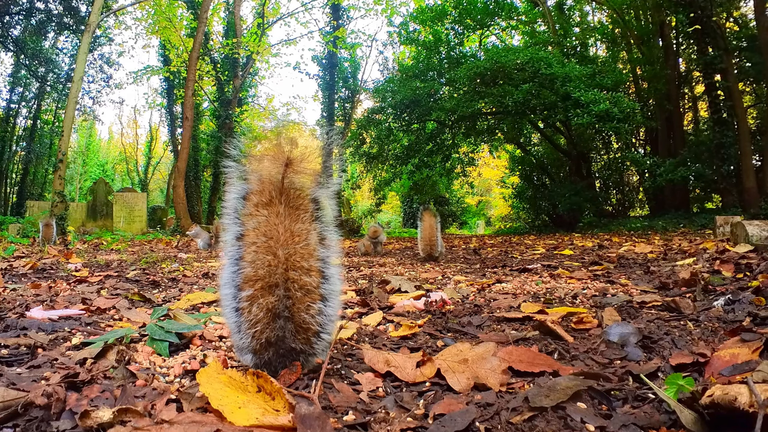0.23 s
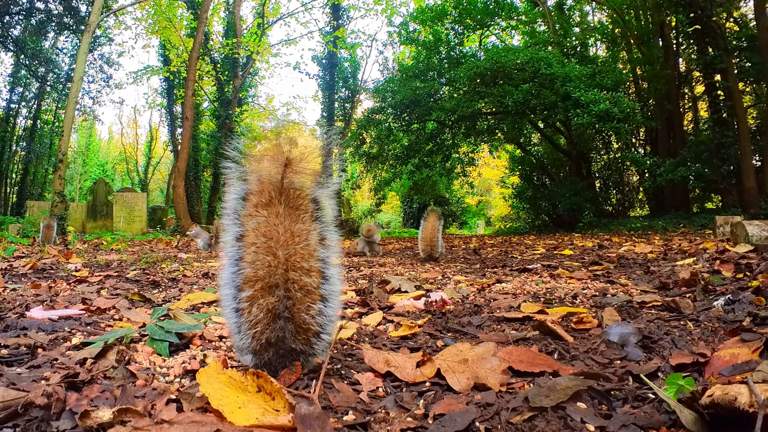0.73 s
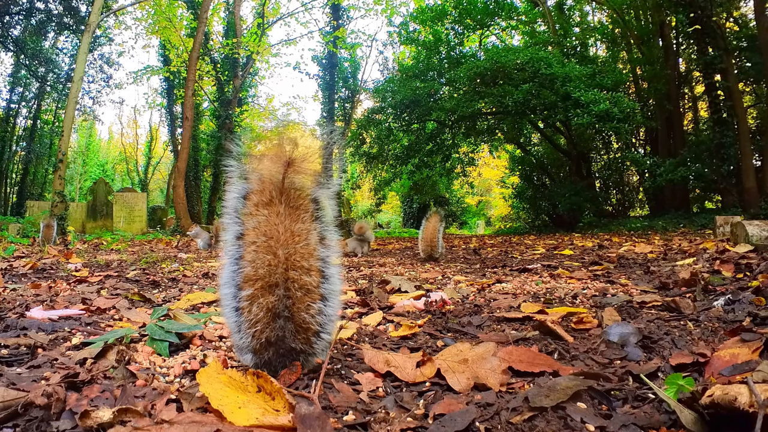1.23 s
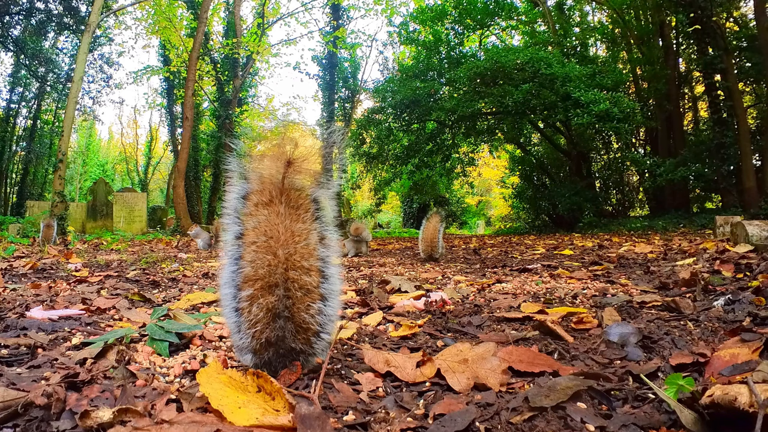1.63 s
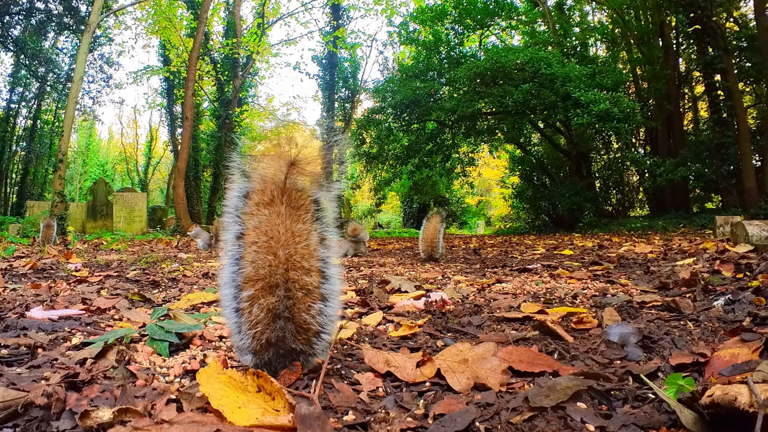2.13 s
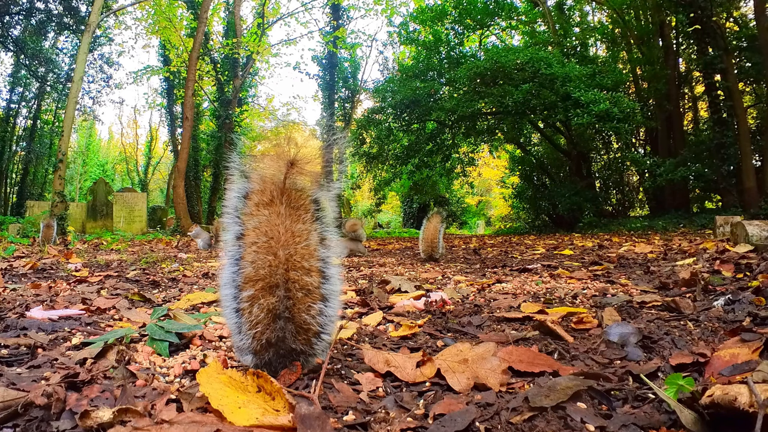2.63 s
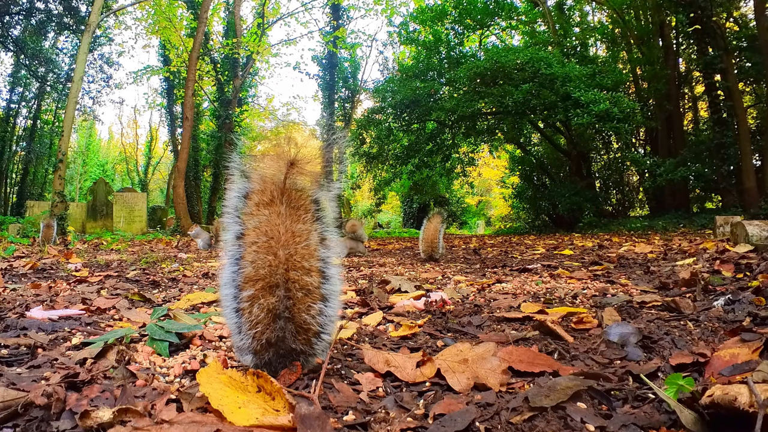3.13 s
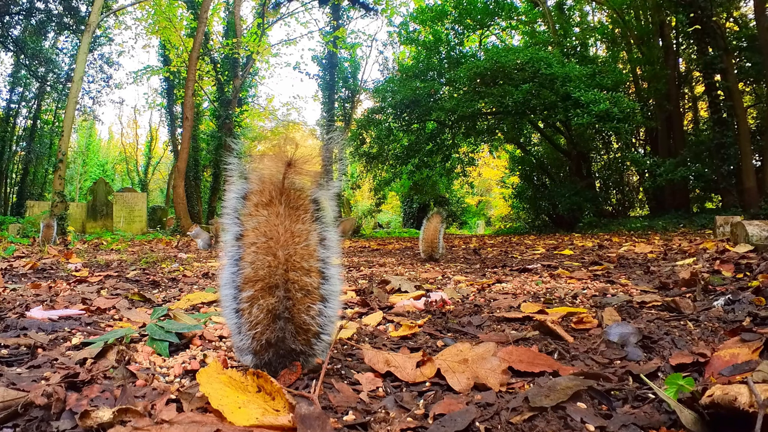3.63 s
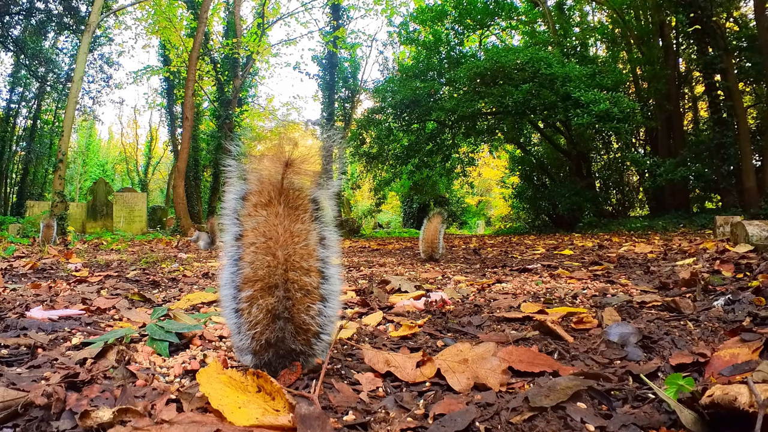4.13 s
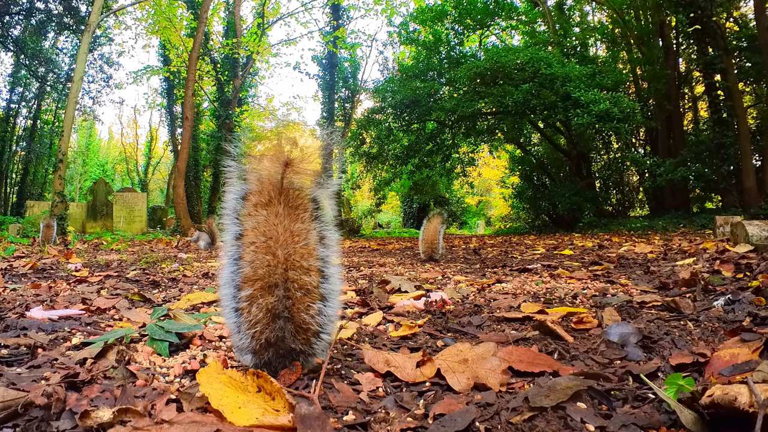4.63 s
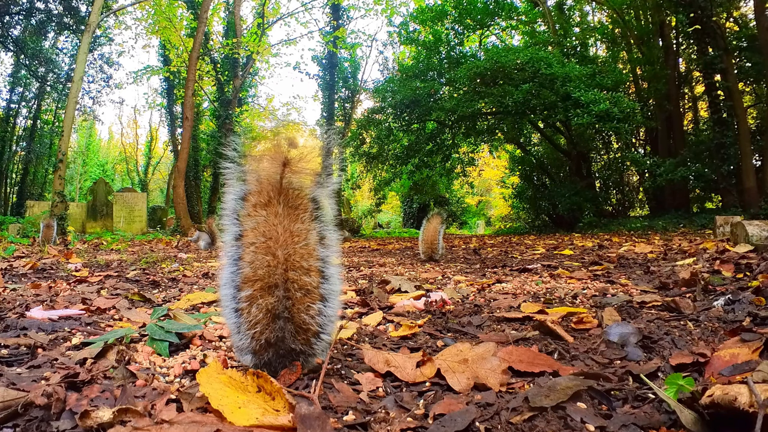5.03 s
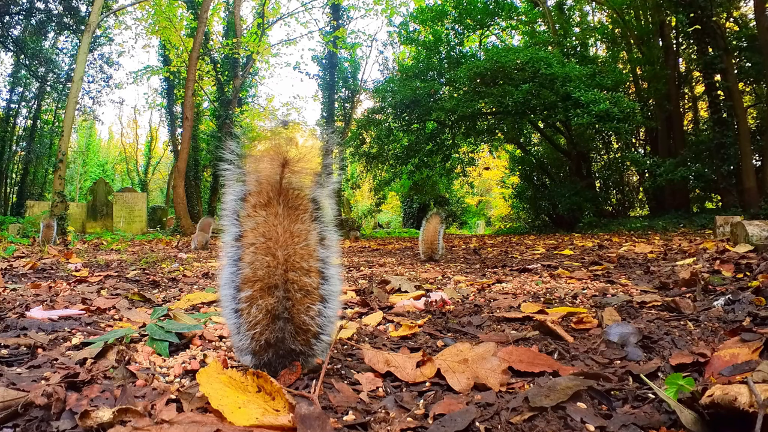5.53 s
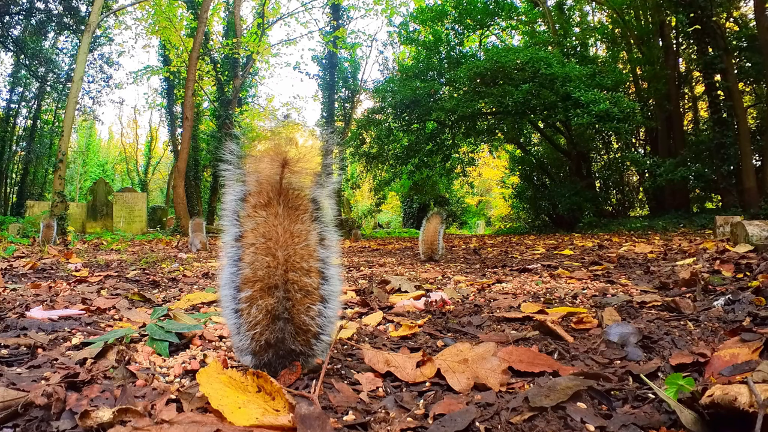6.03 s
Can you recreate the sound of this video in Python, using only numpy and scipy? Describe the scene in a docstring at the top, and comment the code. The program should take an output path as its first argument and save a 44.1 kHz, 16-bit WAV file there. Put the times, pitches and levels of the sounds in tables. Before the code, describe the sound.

A wooded place with a quiet, wavering distant rumble and faint smooth hiss throughout. From 0 to 1.3 seconds a gull-like bird gives five arched yelps, about 0.3 seconds apart; a tiny sliding cry overlaps the first and a rasping bark comes at 0.45. A loud hoarse squawk at 1.4 starts rough, breaks upward and sinks; a deep dull thump lands at 1.6. Shrill parakeet-like screeches come at 1.8, 2.1 and 2.35, with a weaker squawk at 2.1 and a stronger one at 2.6. A short cry and faint squawk fall near 2.9 to 3. Close dry leaves rustle from 3 to 3.9, with small thuds and scuffs from 3.4 to 4 and a squawk at 3.65. Three louder screeches at 4.35, 4.6 and 4.9 run into a piercing cry, thin scream and faint squawk around 5. A noisy bark at 5.7 and last squawk at 5.8 fade in woodland echo; faint rustling ends it.

```python
"""Over a low distant rumble and hiss, a gull-like bird yelps five times, past a sliding cry and a rasping bark.
Its hoarse squawks then run on nearly to the end; a thump lands during the first, and a parakeet-like bird
screeches three times around the second. Leaf litter rustles and crackles under a small animal; three more
screeches, cries, a thin scream and a last bark follow. The calls are summed harmonics that roughness splits
and blurs, echoed by trunks; footfalls are damped thuds with crackle, and leaves are tiny decaying grains."""
import sys
import numpy as np
from scipy import signal
from scipy.fft import rfft, irfft
from scipy.io import wavfile
from scipy.ndimage import map_coordinates

SR = 44100
rng = np.random.default_rng(int(sys.argv[2]) if len(sys.argv) > 2 else 0)


def generate_wav(sig):
    """Save sig (samples, or channels by samples) to the path in sys.argv[1] as 16-bit PCM at SR."""
    pcm = np.round(np.clip(np.atleast_2d(sig).T, -1, 1) * 32767).astype(np.int16)
    wavfile.write(sys.argv[1], SR, pcm)


N = 277830
TIME = np.arange(N) / SR
TOP_HZ = 15600  # upper limit of the harmonics and of the whole scene


def undb(db):
    """Decibels to gain."""
    return 10 ** (np.asarray(db) / 20)


def gain_at(hz, spectrum):
    """Gain of a (Hz, dB) spectrum on a log-frequency axis."""
    f, db = np.transpose(spectrum)
    return undb(np.interp(np.log(np.maximum(hz, 1)), np.log(f), db))


def unit(x):
    """Scale to rms 1."""
    return x / np.sqrt(np.mean(x ** 2))


def colour(x, spectrum):
    """Filter by a (Hz, dB) spectrum."""
    return irfft(rfft(x) * gain_at(np.fft.rfftfreq(len(x), 1 / SR), spectrum), len(x))


def wander(t, rate):
    """Smooth random curve of spread near 1, with rate new values a second."""
    place = (t - t[0]) * rate
    knots = np.random.default_rng(rng.integers(2 ** 31)).standard_normal(int(place[-1]) + 2)
    return map_coordinates(knots, [place], order=2, mode="nearest")


def ramp(t, length):
    """Rise from 0 at t = 0 to 1 after the given length."""
    return np.clip(t / length, 0, 1)


def add(out, start, x):
    """Mix x into out from start s on, trimming what falls outside the scene."""
    i = int(round(start * SR))
    x, i = x[max(-i, 0):], max(i, 0)
    out[i:i + len(x)] += x[:N - i]


# Tone of the distant rumble and hiss. Each row: frequency in Hz, relative level in dB.
AIR = [(20, -23.5), (40, -30.5), (62, -5), (110, 0.5), (160, -2.5), (230, 0.5), (330, -7.5), (480, -12),
       (700, -18.5), (1500, -22), (3500, -26), (7000, -35.5), (12000, -45.5), (15000, -54)]
AIR_DB = -48.5  # rms level of the steady bed


def air(waver_db=3):
    """Shaped noise: a low far-off rumble that wavers, under a smooth hiss."""
    noise = unit(colour(rng.standard_normal(N), AIR))
    low = signal.sosfiltfilt(signal.butter(2, 450, fs=SR, output="sos"), noise)
    swell_db = waver_db * wander(TIME, 9)
    return undb(AIR_DB) * (noise + low * (undb(swell_db) - 1))


def wood(x, wet_db, t60, early_db, early_s, treble_db):
    """Near trunks return separate echoes; the deeper wood returns a diffuse tail that falls 60 dB in t60 s."""
    t = np.arange(SR) / SR
    hits = rng.standard_normal(SR) * (rng.random(SR) < 1400 / SR)  # about 1400 echoes a second
    trunks = hits * np.exp(-t / early_s) * (t > .004)
    tail = rng.standard_normal(SR) * undb(-60 * t / t60) * (1 - np.exp(-t / .02))
    echo = (undb(early_db) * unit(trunks) + undb(wet_db) * unit(tail)) / np.sqrt(SR)
    wet = signal.fftconvolve(x, echo)[:N]
    return x + colour(wet, [(1000, 0.012), (4000, 0.011), (11000, treble_db)])


# Bouts of rustling in dry leaves.
# Each row: middle in seconds, half length in seconds (to 1/e of the gain), level in dB.
RUSTLE = [(3.056, 0.08, -61.5), (3.387, 0.19, -60), (3.745, .17, -62.5), (4.15, 0.21, -71),
          (6.25, .25, -71)]
# Tone of dry leaves, also heard in the footfalls. Each row: frequency in Hz, relative level in dB.
LEAF = [(400, -1.5), (1000, 4.5), (3000, 3.5), (6000, -1), (10000, -3), (12500, -9.5), (15000, -16)]


def leaves(spread_db=3.7, burst_db=3, grain_s=.004, count=1500):
    """Tiny cracks of dry leaves, each a decaying grain with its own pitch, in bursts."""
    cracks, t = np.zeros(N), np.arange(SR // 30) / SR
    for when, pitch, force in rng.random((count, 3)):
        hz = 900 + 11500 * pitch
        swell = t / grain_s * np.exp(-t / grain_s)
        grain = wander(t, 1420) * np.sin(2 * np.pi * hz * t) * swell
        strength = min(-np.log(1 - force), 3)  # mostly weak cracks, a few strong ones
        add(cracks, when * TIME[-1], grain * undb(spread_db * strength))
    bouts = sum(undb(db) * np.exp(-((TIME - middle) / half_s) ** 2) for middle, half_s, db in RUSTLE)
    return unit(colour(cracks, LEAF)) * bouts * undb(burst_db * wander(TIME, 14))


# Thumps and scuffs in the litter.
# Each row: start in seconds, level in dB, pitch of the thud in Hz, time to fall 60 dB in seconds,
# crackle in dB relative to the row's level.
STEPS = [(1.6, -15, 101, 0.049, -51), (3.395, -44.5, 948, 0.056, -3), (3.592, -34, 474, 0.041, -31),
         (3.635, -24.5, 331, 0.059, -19), (3.653, -32, 229, 0.087, -7), (3.779, -30, 208, 0.056, -24),
         (3.797, -30.5, 292, 0.062, -17), (3.912, -38, 236, 0.13, -51), (3.965, -40.5, 342, 0.07, -29)]


def steps():
    """Each footfall thuds in the soft ground as a damped tone with noise, and crushes a few leaves."""
    out, t = np.zeros(N), np.arange(SR // 5) / SR
    crush = t / .008 * np.exp(-t / .008)
    for start, db, hz, t60, crackle_db in STEPS:
        fall = (1 - np.exp(-t / .002)) ** 2 * undb(-60 * t / t60)
        thud = 2 * np.sin(2 * np.pi * hz * t) + 1.56 * wander(t, 4 * hz)
        uneven_noise = rng.standard_normal(len(t)) * np.exp(wander(t, 400))
        crackle = unit(colour(uneven_noise, LEAF)) * crush
        add(out, start, undb(db) * (thud * fall + undb(crackle_db) * crackle))
    return out


def voice(rows, throat, centre_hz, jitter, beat_hz, side_db, smear, blur_hz, flutter, flutter_hz, count,
          uneven_db=3, side_blur=0, beat_waver=0.125):
    """A bird's cry: roughness adds lines of a second, slower vibration and blurs the highest into hiss."""
    # each row: time in s, pitch in Hz, level in dB, brightness in dB per octave, roughness
    s, *columns = np.transpose(rows)
    t = np.arange(s[0], s[-1] + .002, 1 / SR)
    hz, db, bright_db, rough = (np.interp(t, s, c) for c in columns)
    rough = np.clip(rough, 0, 1)
    hz = hz * (1 + .008 * wander(t, 70))
    # besides this slow waver, a fast pitch jitter grows with roughness
    shaky_hz = hz * (1 + jitter * (rough + 0.15) * wander(t, 500.7))
    phase = 2 * np.pi * np.cumsum(shaky_hz) / SR
    beat = 2 * np.pi * np.cumsum(beat_hz * (1 + beat_waver * wander(t, 70))) / SR
    out = 0
    for k in range(2, count):
        harmonic, side = divmod(k, 3)  # side 1 and 2: the lines above each harmonic
        f = harmonic * hz + side * beat_hz
        size = gain_at(f, throat) * undb(bright_db * np.log2(f / centre_hz)) * (f < TOP_HZ)
        if side:
            size = size * rough * undb(side_db + uneven_db * wander(t, 25.3))
        # turbulence widens each line, the more the higher it lies
        extra = side_blur * (side > 0)
        blur = smear * rough + np.sqrt(rough) * (f / blur_hz) ** 4 + extra
        width = np.mean(f) / 6 * (1 + extra)
        smudge = wander(t, width) + 1j * wander(t, width)
        tone = (1 + blur * smudge) / np.sqrt(1 + 2 * blur ** 2)
        out = out + np.real(size * tone * np.exp(1j * (harmonic * phase + side * beat)))
    edges = np.clip(np.minimum(t - t[0], t[-1] - t) / .003, 0, 1)
    throb = np.exp(flutter * np.sqrt(rough) * np.tanh(wander(t, flutter_hz)))  # the membranes beat unevenly
    track = np.zeros(N)
    add(track, s[0], out * edges * throb * undb(db))
    return track


def repeats(shape, calls):
    """Stretch, transpose and place one call shape for each row of a run."""
    share, hz, db, bright, rough = np.transpose(shape)
    return [np.column_stack([start + share * length, hz * ratio, db + call_db,
                             bright + call_bright, rough + call_rough])
            for start, length, ratio, call_db, call_bright, call_rough in calls]


SLUR_SETTLE = 0.36  # share of a slur over which its roughness changes


def slur(call, peak_share, rise_db, fall_db):
    """One gliding note that swells to a peak and dies away."""
    start, length, first_hz, last_hz, bend, db, bright_db, first_rough, last_rough = call
    u = np.linspace(0, 1, 40)
    hz = first_hz + (last_hz - first_hz) * u ** bend
    rise = rise_db * (1 - ramp(u, peak_share)) ** 2
    fall = fall_db * ramp(u - peak_share, 1 - peak_share)
    rough = first_rough + (last_rough - first_rough) * ramp(u, SLUR_SETTLE)
    return np.column_stack([start + u * length, hz, db - rise - fall, np.full_like(u, bright_db), rough])


# Rasping barks, then a thin held scream. Each row: start in seconds, length in seconds, first pitch in Hz,
# last pitch in Hz, bend (1 is a straight glide), level in dB, brightness in dB per octave,
# first roughness and last roughness from 0 to 1.
RASPS = [(0.441, 0.12, 2170, 1447, 1.1, -34, -2, 0.4, 0.25),
         (5.664, .135, 1628, 1246, 1.2, -38.5, 1, 0, 0.83)]
SCREAM = [(5.062, .213, 1801, 1720, 0.42, -33.5, 1, 0.54, .08)]
# Throat colours of the barks and the scream. Each row: frequency in Hz, gain in dB.
RASP_THROAT = [(700, -40), (1500, -3.5), (2000, -8), (2700, 8.5), (3300, -6.5), (4000, -7), (5000, -10.5),
               (6200, -4.5), (7200, -25.5), (9500, -31), (12000, -38), (14000, -44)]
SCREAM_THROAT = [(1700, -48), (3500, 11), (4300, -8), (5250, 2), (6500, -20), (8000, -1.5), (8800, -16),
                 (9500, -28), (12000, -47)]


def rasp():
    """Gliding notes with strong lines of the slower vibration: noisy barks and a thin held scream."""
    barks = sum(voice(slur(bark, peak_share=0.38, rise_db=12, fall_db=15.5), RASP_THROAT, 3100,
                      jitter=0.026, beat_hz=526, side_db=1.5, smear=0.7, blur_hz=7400,
                      flutter=0.17, flutter_hz=413, count=27) for bark in RASPS)
    scream = voice(slur(SCREAM[0], peak_share=0.13, rise_db=10, fall_db=25.5), SCREAM_THROAT, 4600,
                   jitter=0.025, beat_hz=538, side_db=3.5, smear=0.5, blur_hz=9500,
                   flutter=.25, flutter_hz=294, count=21)
    return barks + scream


# One screech in three registers: rise, hold, fall. Each row: share of the call's length, pitch in Hz,
# level in dB, brightness in dB per octave, roughness from 0 to 1.
SCREECH = [
    [(0, 1772, -10, 3, 0.2), (.07, 2040, -3.5, 1, 0.4), (.185, 2960, -1, 6, 0.59)],
    [(.2, 1988, -1, 14, 0.08), (.31, 2022, 2, 4.5, 0.19), (.39, 1907, 4.5, 11.5, 0)],
    [(.41, 2619, 6, 7.5, 0), (.6, 2350, 0.5, -1, .2), (.78, 2058, 4, 6.5, 0.23), (.93, 1874, 4, 9.5, 0.15),
     (1, 1730, -27, -7, 0.2)],
]
# The two runs of three. Each row: start in seconds, length in seconds, pitch ratio, level in dB,
# brightness in dB per octave, added roughness from 0 to 1.
SCREECHES = [(1.81, 0.16, 0.95, -25.5, 0, 0.05), (2.08, 0.14, 0.96, -23.5, -1, 0.06),
             (2.338, 0.14, 0.94, -24, -1, 0.09), (4.344, 0.16, 0.96, -23, 0, 0.04),
             (4.619, .128, 0.95, -21.5, -0.5, 0.03), (4.881, 0.13, 0.94, -21.5, -1, 0.13)]
# Shrill slurred cries. Each row: start in seconds, length in seconds, first pitch in Hz, last pitch in Hz,
# bend (1 is a straight glide), level in dB, brightness in dB per octave,
# first roughness and last roughness from 0 to 1.
CRIES = [(0.024, 0.059, 2420, 1740, 1.76, -35.5, -9.5, 0.32, .14),
         (2.882, 0.087, 2184, 1527, 1.03, -31.5, -5.5, 0.2, 0.1),
         (2.952, 0.028, 1532, 1910, 1, -44, -8, .1, .2),
         (4.986, 0.042, 1458, 2286, 2, -27.5, -9, 0.85, 0.9),
         (5.045, 0.094, 2300, 1480, 0.6, -19, -6, 0.35, .05)]
# Throat colour of the shrill bird. Each row: frequency in Hz, gain in dB.
SCREECH_THROAT = [(900, -19.5), (1650, -20.5), (2400, -9.5), (3000, -2), (3700, -0.5), (4800, -0.5),
                  (5400, -20), (6200, -16), (7200, -46.5), (7900, -23.5), (8400, -33), (9600, -37.5),
                  (12500, -56.5), (14000, -79)]


def screeches():
    """Shrill calls through a throat that favours 3 to 5 kHz, above the pitch itself."""
    calls = [rows for register in SCREECH for rows in repeats(register, SCREECHES)]
    calls += [slur(cry, peak_share=0.4, rise_db=13, fall_db=14) for cry in CRIES]
    return sum(voice(rows, SCREECH_THROAT, 4000, jitter=.025, beat_hz=680, side_db=-6, side_blur=1.2,
                     smear=.75, blur_hz=7400, flutter=.45, flutter_hz=450, count=24) for rows in calls)


# Throat colour of the hoarse calls. Each row: frequency in Hz, gain in dB.
SQUAWK_THROAT = [(450, -45), (780, -18), (1050, 1.5), (1250, 4), (1500, -6), (1850, -6.5), (2150, -14),
                 (2500, -0.5), (3100, -8), (3500, -8.5), (3900, -19.5), (4300, -12.5), (4750, -35.5),
                 (9000, -66)]
# Nasal resonance of the squawks. Each row: frequency in Hz, gain in dB.
NASAL = [(1150, -39), (1380, -2), (1850, 19), (2150, -18.5), (3000, -66)]
CLEAR_NASAL_DB = -7  # nasal resonance outside the rasp
SCOOP, SCOOP_S = 0.19, .016  # a squawk starts this share of its top pitch flat and slides up
ATTACK_S, CLEARING_S = 0.0046, 0.029  # onset and end of the rasp
DROP_S, BREAK_S = 0.02505, 0.0094  # drop to the low pitch, jump back up
SAG_POWER, FADE_POWER = 1.8, 1.09  # pitch and level fall ever faster
SHUT_DB, OPENING_S = -5.5, 0.094  # the beak starts shut and dull (dB per octave), then opens
CLEAR_ROUGH = 0.14  # roughness once the rasp is over
SWELL_DB = 3.5  # the rasp grows by this much up to the break
LEAD_DECAY_DB = 1.5  # the lead-in dies down by this much before the rasp


def squawk(call):
    """A soft scoop, a rasp that drags the pitch down, then a break up to a clear note that sinks and fades."""
    (start, lead_s, low_s, sink_s, rasp_s, low_hz, top_hz, sag_hz, beat_hz, db, lead_db, fade_db,
     rasp_bright, clear_bright, lead_rough, rasp_rough, nasal_db) = call
    t = np.arange(0, lead_s + low_s + sink_s, .001)
    since = t - lead_s
    pushed, cleared = ramp(since, ATTACK_S), ramp(since - rasp_s, CLEARING_S)
    rasping = pushed - cleared
    low = ramp(since, DROP_S) - ramp(since - low_s, BREAK_S)
    sunk = ramp(since - low_s, sink_s)
    scooped_hz = top_hz * (1 - SCOOP * np.exp(-t / SCOOP_S))
    hz = scooped_hz + (low_hz - top_hz) * low - sag_hz * sunk ** SAG_POWER
    lead_in = lead_db + LEAD_DECAY_DB * (.5 - ramp(t, lead_s))
    swell = SWELL_DB * (pushed - ramp(since, low_s))
    level = db + lead_in * (1 - pushed) - swell - fade_db * sunk ** FADE_POWER
    beak = SHUT_DB * (1 - ramp(t, OPENING_S))
    bright = beak + rasp_bright + (clear_bright - rasp_bright) * cleared
    rough = lead_rough * (1 - pushed) + rasp_rough * rasping + CLEAR_ROUGH * cleared
    rows = np.column_stack([start + t, hz, level, bright, rough])
    sound = voice(rows, SQUAWK_THROAT, 1276, jitter=.02, beat_hz=beat_hz, side_db=-1, smear=.27, blur_hz=5700,
                  flutter=0.39, flutter_hz=410.4, count=22, uneven_db=4, beat_waver=.09)
    boost_db = np.interp(TIME, start + t, CLEAR_NASAL_DB + (nasal_db - CLEAR_NASAL_DB) * rasping)
    return sound + colour(sound, NASAL) * (undb(boost_db) - 1)


# The slur in which the last yelp trails off. Its row: start in seconds, length in seconds, first pitch in Hz,
# last pitch in Hz, bend (1 is a straight glide), level in dB, brightness in dB per octave,
# first roughness and last roughness from 0 to 1.
YELP_TAIL = [(1.264, .074, 1070, 950, .9, -30, 5.5, .4, .04)]
# Hoarse squawks. Each row: start, lead-in, low part, sinking part and rasp in seconds,
# low pitch, top pitch, sag and slow vibration in Hz, peak level, lead-in and fade in dB,
# rasp brightness and clear brightness in dB per octave, lead-in roughness and rasp roughness from 0 to 1,
# nasal boost in dB.
SQUAWKS = [(1.372, .036, 0.07, .18, 0.13, 1120, 1178, 254.5, 404.5, -21, -7.5, 10.5, .5, 4.5, 0.1, 0.71, -2),
           (2.085, .045, 0.052, .15, 0.055, 1090, 1222, 206, 389, -33.5, -10, 12.5, -2, 7.5, .55, 0.34, -5),
           (2.604, 0.032, .096, 0.16, 0.098, 1051, 1177, 177.6, 333, -24, -6.5, 20, -1, 5, 0.37, 0.65, 0),
           (2.995, 0.022, .078, 0.12, 0.083, 1047, 1212, 100, 393, -37.5, -10.5, 15, 1, 0.5, .85, 0.84, -2),
           (3.645, 0.0234, .119, .165, 0.073, 1046, 1187, 144, 409, -31, -3, 17.5, -0.5, 6, 0.54, 0.8, 4),
           (4.96, .055, 0.094, 0.19, 0.12, 1088, 1219, 144.3, 390, -36, -8.5, 11.5, 8, 11.5, 0.1, 0.58, -1.5),
           (5.812, .066, 0.037, 0.23, 0.093, 1069, 1230, 125.2, 361.4, -35, -9, 15, -1.5, 5.5, .12, 0.55, 2)]


def squawks():
    """The hoarse calls, and the short slur that leads into them."""
    tail = voice(slur(YELP_TAIL[0], peak_share=0.4, rise_db=14.5, fall_db=15.5), SQUAWK_THROAT, 880,
                 jitter=.02, beat_hz=387, side_db=-3, smear=.28, blur_hz=5700,
                 flutter=.37, flutter_hz=407, count=22)
    return tail + sum(squawk(call) for call in SQUAWKS)


# One yelp. Each row: share of its length, pitch in Hz, level in dB, brightness in dB per octave,
# roughness from 0 to 1.
YELP = [(0, 1002, -9, -0.5, 0.3), (.16, 1116, -13, 3.5, 0.54), (.185, 1354, -4.5, -3, 0),
        (.42, 1419, -10, -0.5, 0), (.6, 1382, -6, 0.5, 0.02), (.75, 1282, -1, 7, 0.02),
        (.9, 1166, -1, 2, 0.01), (1, 897, -5.5, 3.5, 0)]
# The five yelps. Each row: start in seconds, length in seconds, pitch ratio, level in dB,
# brightness in dB per octave, added roughness from 0 to 1.
YELPS = [(-.012, 0.18, 1.005, -22, -2.5, 0.02), (0.271, 0.18, 0.99, -22.5, 0.5, 0),
         (0.559, 0.17, 0.98, -23, -1.5, 0.11), (0.849, .157, .975, -23.5, -2.5, 0.04),
         (1.168, 0.122, 0.925, -24.5, -3.5, 0.4)]
# Throat colour of the yelps. Each row: frequency in Hz, gain in dB.
YELP_THROAT = [(500, -52.5), (900, -8.5), (1200, 4.5), (1450, 0.5), (1800, -22), (2350, -5), (2750, 6.5),
               (3100, -16.5), (3500, -14), (3950, -21.5), (4200, -43.5), (5200, -55), (8000, -59),
               (12000, -65.5)]


def yelps():
    """Arched notes whose harmonics start with a rough catch, then ring clearer."""
    return sum(voice(rows, YELP_THROAT, 1250, jitter=0.025, beat_hz=422, side_db=-6.5, smear=0.82,
                     blur_hz=5500, flutter=0.13, flutter_hz=187, count=19) for rows in repeats(YELP, YELPS))


def scene():
    """Two voices echoing in the wood, with footfalls, leaves and rumble left dry."""
    no_lows = signal.butter(6, 720, "high", fs=SR, output="sos")  # a small beak radiates no lows
    low_voice = signal.sosfilt(no_lows, yelps() + squawks())
    far = signal.butter(8, 12000, fs=SR, output="sos")  # distance takes the highest hiss
    shrill_voice = signal.sosfilt(far, screeches() + rasp())
    low_bird = wood(low_voice, wet_db=-11, t60=0.44, early_db=-7.0, early_s=0.063, treble_db=-9.5)
    shrill_bird = wood(shrill_voice, wet_db=-14, t60=0.67, early_db=-2.5, early_s=0.06, treble_db=4.0)
    no_sub = signal.butter(4, 50, "high", fs=SR, output="sos")  # keeps the thuds free of deep bass
    footfalls = signal.sosfilt(no_sub, steps())
    return (low_bird + shrill_bird + footfalls + leaves() + air())[None]


def record(dry):
    """A steep low-pass cuts the top."""
    return signal.sosfilt(signal.ellip(8, .2, 70, TOP_HZ, fs=SR, output="sos"), dry)


dry = scene()
out = record(dry)
generate_wav(out)
```